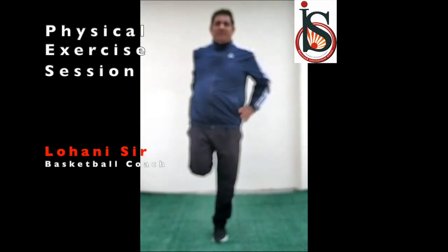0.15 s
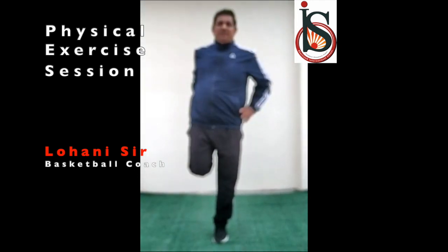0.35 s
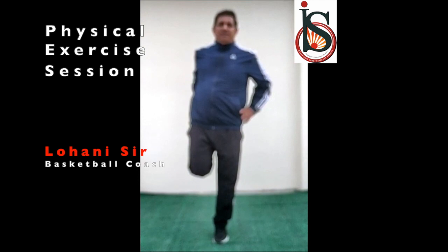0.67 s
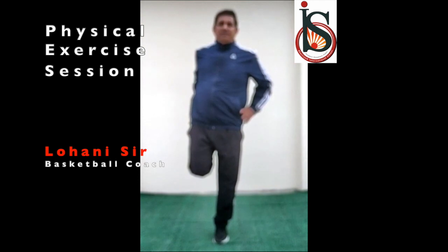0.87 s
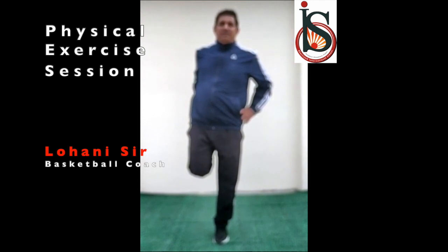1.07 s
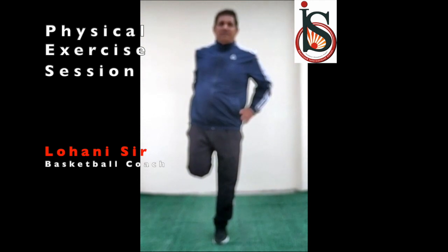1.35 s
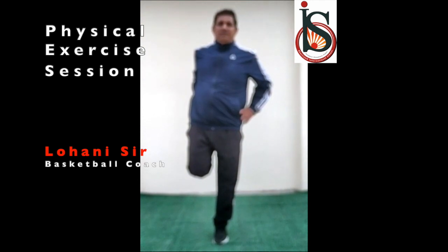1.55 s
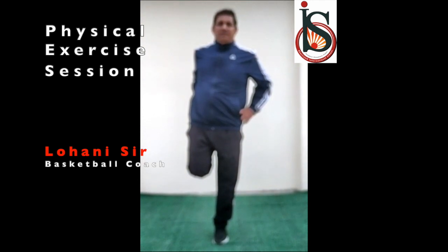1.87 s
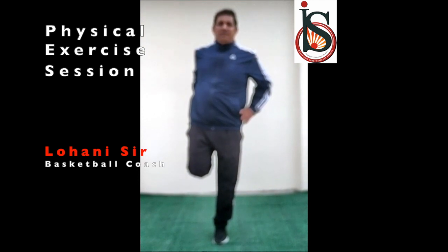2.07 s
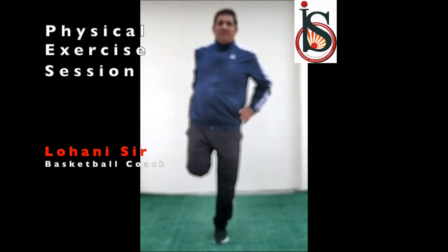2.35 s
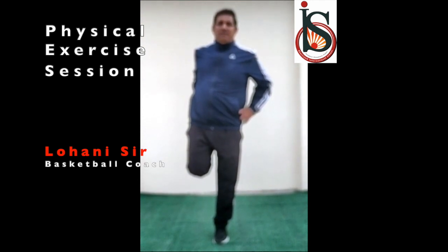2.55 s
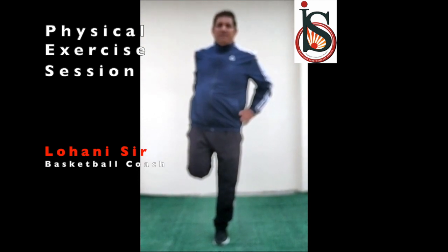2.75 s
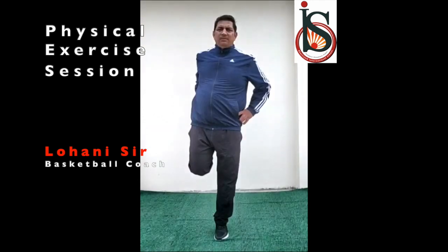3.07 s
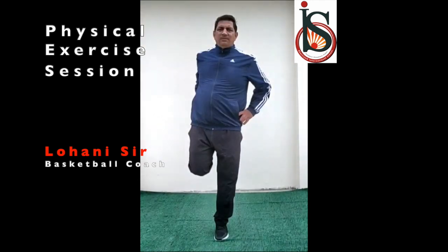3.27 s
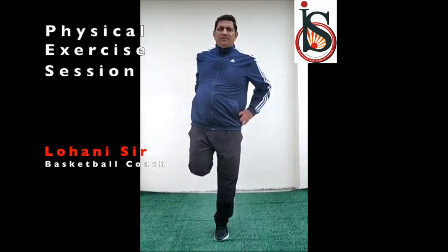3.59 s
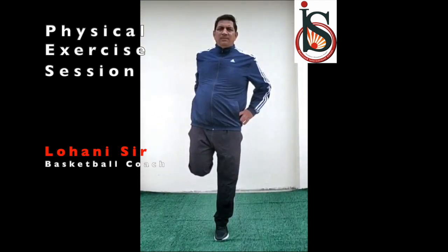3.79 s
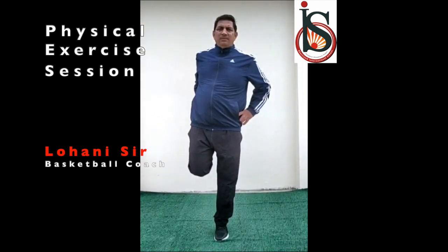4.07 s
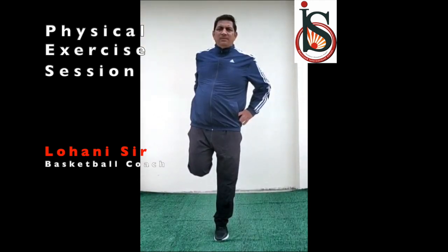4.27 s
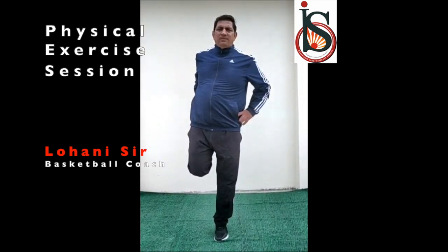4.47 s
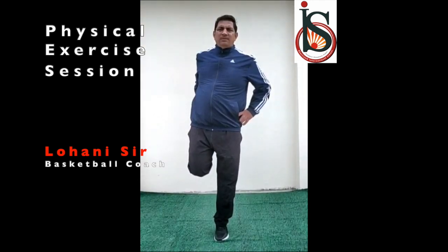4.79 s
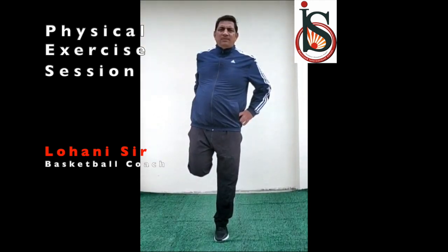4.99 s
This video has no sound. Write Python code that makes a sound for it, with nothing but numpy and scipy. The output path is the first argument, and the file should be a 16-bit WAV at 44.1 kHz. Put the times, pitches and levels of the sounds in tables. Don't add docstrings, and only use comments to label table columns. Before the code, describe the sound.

A bird rolls out low throbbing notes with far echoes while a nearer one throws sharp falling chirps; soft wind thumps outdoors.

```python
import sys
import numpy as np
from scipy import signal
from scipy.fft import rfft, irfft, next_fast_len
from scipy.io import wavfile
from scipy.ndimage import uniform_filter1d, map_coordinates

SR = 44100
rng = np.random.default_rng(int(sys.argv[2]) if len(sys.argv) > 2 else 0)


def materialize(psi):
    bounded = np.clip(np.atleast_2d(psi).T, -1, 1)
    quanta = np.round(bounded * 32767).astype(np.int16)
    wavfile.write(sys.argv[1], SR, quanta)


def boost_factor(decibels):
    exponent = np.asarray(decibels, float) / 20
    return 10 ** exponent


N = 226385


def along(points, hz):
    f, v = np.transpose(points)
    return np.interp(np.log(hz + 1), np.log(f + 1), v)


def unit(x):
    return x / np.sqrt(np.mean(x ** 2) + 1e-20)


def filtered(x, response):
    m = next_fast_len(N + SR // 2)
    hz = np.fft.rfftfreq(m, 1 / SR)
    return irfft(rfft(x, m) * response(hz), m)[..., :N]


def add(track, s, piece):
    start = max(round(s * SR), 0)
    room = track[..., start:start + piece.shape[-1]]
    room += piece[..., :room.shape[-1]]


def wobble(size, rate):
    knots = rng.standard_normal(int(size * rate / SR) + 4)
    return map_coordinates(knots, [np.arange(size) * rate / SR])


# hz, likeness (0-1)
PORT_LIKENESS = [(100, 1), (640, 0.83), (1400, 0.3), (3000, 0.05), (15000, 0)]


def rush(spectrum, patchy_db):
    z = signal.stft(rng.standard_normal((2, N)), nperseg=512)[2]
    patches = uniform_filter1d(uniform_filter1d(rng.standard_normal(z.shape[1:]), 5, 0), 10, 1)
    pair = signal.istft(z * boost_factor(patchy_db * unit(patches)), nperseg=512)[1][:, :N]

    def color(hz):
        turn = np.arccos(np.clip(along(PORT_LIKENESS, hz), -1, 1)) / 2
        return boost_factor(along(spectrum, hz)) * np.array([np.cos(turn), np.sin(turn)])

    mid, side = filtered(pair, color)
    return unit(np.array([mid + side, mid - side]))


# hz, t60_s
YARD_DECAY = [(500, 0.14), (2500, 0.41), (5000, 0.67), (10000, 0.28)]


def yard(x, haste):
    hz, t, z = signal.stft(rng.standard_normal((2, SR // 2)), SR, nperseg=256)
    decay = boost_factor(-60 * haste * t / along(YARD_DECAY, hz)[:, None])
    tail = signal.istft(z * decay, SR, nperseg=256)[1]
    return signal.fftconvolve(x[None], tail / np.linalg.norm(tail[0]), axes=1)[:, :N]


# start_s, flock_db, town_db
WASH_LEVELS = [(0.0, -69.5, -60), (0.26, -71, -55.5), (1.109, -72.5, -65), (1.428, -69.5, -55.5),
               (1.998, -75, -64.5), (2.16, -81, -62.5), (3.34, -60.5, -59), (3.761, -68.5, -57),
               (4.26, -83, -67), (4.429, -62, -48), (4.718, -62.5, -62), (5.13, -48, -47)]
# hz, level_db (per Hz)
AIR_COLOR = [(260, -57), (450, 6.5), (623, -2.5), (1230, -16.5), (1760, -15.5), (2010, -15), (2470, -19.5),
             (3180, -22), (11700, -22.5), (15500, -16)]
FLOCK_COLOR = [(1200, -52), (1600, -3.5), (2000, 2), (2600, -10.5), (3600, -3), (4300, -8), (5200, -19),
               (6200, -60.5)]
TOWN_COLOR = [(15, -53.5), (40, -11), (85, -10), (103, 3), (125, -16.5), (200, -8), (250, -2), (340, 1.5),
              (430, -8), (560, -40)]


def background():
    hum_top_hz = 182
    s, *levels = np.transpose(WASH_LEVELS)
    flock_db, town_db = [np.interp(np.arange(N) / SR, s, db) for db in levels]
    flock = boost_factor(flock_db - 1.0) * rush(FLOCK_COLOR, patchy_db=5.5)
    town = filtered(boost_factor(town_db + 1.0) * rush(TOWN_COLOR, patchy_db=3.5), lambda hz: hz > hum_top_hz)
    hum = filtered(boost_factor(-61) * rush(TOWN_COLOR, patchy_db=2.9), lambda hz: hz <= hum_top_hz)
    air = boost_factor(-60.5) * boost_factor([[-2.5], [-.6]]) * rush(AIR_COLOR, patchy_db=4.5)
    return air + town + hum + flock


# start_s (first eddy), length_s, level_db, fade_db_per_s
GUSTS = [
    (0.862, .045, -45, -30),
    (1.292, 0.076, -47.5, -57),
    (1.453, .13, -22.5, -40.5),
    (1.821, .02, -31, 8),
    (1.891, 0.14, -18.5, -47),
    (2.056, .1, -45, 9),
    (2.325, 0.0604, -40.5, 149),
    (2.469, 0.0306, -33.5, -3),
    (4.588, 0.076, -35, -19),
    (4.898, .02, -41, 5),
]


def eddies():
    shed_s, tone_hz, width_ms = .037, 110.7, 12
    rows, step = [], np.arange(6) * shed_s
    for (s, span, db, fade), luck in zip(GUSTS, rng.standard_normal((len(GUSTS), 2, 4, 6))):
        for (late, size, tone, width), lag, loss in zip(luck, (0, .017), (0, -9)):
            spent = 3000 * np.clip(step - span, 0, 1)
            level = db + loss + fade * step + 2 * size - spent
            times = s + step + lag + .003 * late
            rows += zip(times, level, tone_hz * np.exp(.17 * tone), width_ms * np.exp(.3 * width))
    return rows


def bursts(rows, stretch):
    track, t = np.zeros(N), np.arange(-SR // 20, SR // 20) / SR
    for (s, db, hz, ms), turn in zip(rows, rng.random((len(rows), 1))):
        bell = np.exp(-(t / (stretch * ms / 1000)) ** 2)
        burst = boost_factor(db) * bell * np.cos(2 * np.pi * (hz * t + turn))
        skip = max(0, len(t) // 2 - round(s * SR))
        add(track, s - 1 / 20, burst[skip:])
    return track


# hz, level_db (per Hz)
TURBULENCE_COLOR = [(15, -35), (60, -4.5), (120, -11.5), (250, -12), (450, -24.5), (900, -69)]


def wind():
    puffs = bursts(eddies(), stretch=0.5)
    sharpened = puffs + 0.41 * puffs * np.abs(puffs)
    gust = uniform_filter1d(uniform_filter1d(np.abs(puffs), 900), 900)
    turbulence = boost_factor(-3.5) * gust * rush(TURBULENCE_COLOR, patchy_db=-0.5)[0]
    return (sharpened + turbulence) * boost_factor([[-30], [0.3]])


# start_s, length_s, level_db
CAWS = [
    (0.154, 0.31, -59.5),
    (0.66, 0.29, -65.5),
    (0.886, 0.19, -67),
    (4.784, 0.37, -62.5),
]
# hz, level_db (per Hz)
CROW_THROAT = [(1050, -54), (1250, -6), (1450, 2.5), (1600, -4.5), (1800, 5.5), (2100, -12.5), (2400, -49)]


def crow():
    swell = np.zeros(N)
    for s, span, db in CAWS:
        add(swell, s, boost_factor(db) * signal.windows.tukey(round(span * SR), .6))
    return swell * rush(CROW_THROAT, patchy_db=2.5) * boost_factor([[-4], [1.5]])


# start_s, length_s, start_hz, end_hz, peak_db
WHISTLES = [(0.0, 0.042, 5306, 5020, -55.5), (0.286, 0.38, 3368, 2887, -72.5),
            (0.645, 0.02, 4570, 4750, -69), (0.765, 0.087, 3064, 2340, -56),
            (0.83, 0.0314, 2553, 2365, -54), (0.914, 0.0242, 1730, 2184, -66),
            (0.931, 0.0487, 2205, 1866, -42), (1.522, 0.023, 5160, 5600, -52.5),
            (2.088, 0.052, 3004, 2770, -67), (2.137, 0.015, 3620, 4160, -60.5),
            (2.294, 0.043, 5000, 4955, -58.5), (2.561, 0.059, 4110, 5585, -68.5),
            (3.377, 0.041, 4140, 3870, -53), (3.617, 0.1, 2796, 2424, -56.5),
            (3.699, 0.031, 3620, 3390, -67),
            (4.235, 0.053, 1824, 2396, -54.5), (4.273, 0.033, 4320, 4320, -57.5),
          (4.296, 0.06, 2860, 2298, -40), (4.313, 0.077, 4230, 3310, -49),
          (4.401, 0.077, 5380, 4840, -62.5), (4.456, 0.06, 2083, 1712, -46),
          (4.578, 0.056, 4090, 3190, -47), (4.615, 0.086, 2067, 1830, -41),
          (4.659, 0.041, 4660, 5050, -63.5), (4.756, 0.041, 2660, 2400, -53),
          (4.798, 0.048, 2214, 2346, -53.5), (4.837, 0.11, 3774, 3440, -41.5),
          (4.845, 0.073, 3167, 2286, -35.5), (5.023, 0.035, 2255, 2442, -36),
          (5.036, 0.051, 2410, 2238, -35.5), (5.089, 0.04, 3800, 3400, -45.5)]


def far_birds():
    out = np.zeros((2, N))
    songs = WHISTLES
    for (s, span, start_hz, end_hz, db), side in zip(songs, rng.standard_normal((len(songs), 1))):
        u = np.linspace(0, 1, round(span * SR))
        pitch = (start_hz + (end_hz - start_hz) * u) * (1 + 0.015 * wobble(len(u), 600))
        phase = 2 * np.pi * np.cumsum(pitch) / SR
        flutter_db = 3.5 * np.array([wobble(len(u), 110), wobble(len(u), 150)])
        shape = np.sin(np.pi * u ** .7) * boost_factor(flutter_db)
        add(out, s, boost_factor(db + 2 * side * np.array([[1], [-1]])) * shape * np.sin(phase))
    return out + boost_factor(-2.0) * yard(out.mean(axis=0), haste=2.3)


# share of its length, ratio to crest pitch, level_db
CALL = [
    (0, .79, -13),
    (.035, .855, -2),
    (.082, 1.1, -8.5),
    (.16, .975, -1.5),
    (0.309, 1.001, -1.5),
    (0.518, .915, -1),
    (.78, .8, 0),
    (.91, .72, -2.5),
    (1.001, .615, -16.5),
]


def call_rows(s, span, hz, db, push, push_db):
    u = np.linspace(0, 1, num=100)
    share, ratio, shape_db = np.transpose(CALL)
    near = (u - push) / 0.089
    bell = push_db * np.exp(-near ** 2)
    pitch = hz * np.interp(u, share, ratio) * (1 - 0.0024 * 2 * near * bell)
    return np.transpose([s + u * span, pitch, db + np.interp(u, share, shape_db) + bell])


# hz, gain_db
BEAK = [(1500, -55), (1930, -32), (2080, -10), (2350, -16), (4300, -14), (5000, -8), (5650, -8),
        (6050, -24), (6500, -40), (7300, -30), (8200, -21), (8800, -23), (9700, -25), (10300, -36),
        (11500, -36), (13000, -55)]
# hz, gain_db
LEAVES = [(1500, 12.5), (3300, -5.5), (4300, -2), (5200, -3.5), (8000, 3), (11000, -4)]


def chirp(rows, open_s, shut_s, flick_db, third_db, upper_db, slap_db):
    s, hz, db = np.transpose(rows)
    t = np.arange(s[0] - .003, s[-1] + 0.003, 1 / SR)
    size, since, left = len(t), t - t[0], t[-1] - t
    pitch = uniform_filter1d(np.interp(t, s, hz), 90)
    level = boost_factor(np.interp(t, s, db) + .9 * wobble(size, 200)) * signal.windows.tukey(size, .06)
    phase = 2 * np.pi * np.cumsum(pitch) / SR

    def partial(k, gain_db):
        rough = .02 * k * k * wobble(size, 700)
        return boost_factor(gain_db + along(BEAK, k * pitch)) * np.sin(k * phase + rough)

    upper = np.zeros(size)
    for k in range(4, 7):
        upper += partial(k, upper_db - 6 * (k - 4) + (2.5 * k - 8) * wobble(size, 40))
    upper *= np.clip((since - .012) / .03, .1, 1) * np.clip(left / .03, 0, 1)
    flick_loss = flick_db * np.clip((open_s - since) / 0.013, 0, 1)
    shut_loss = 12 * np.clip((since - shut_s) / .015, 0, 1)
    third = partial(2.983, third_db + 3.0 * wobble(size, 86) - flick_loss - shut_loss)

    voice, slap = np.zeros((2, N))
    add(voice, t[0], level * (partial(0.99, 3) + np.sin(2 * phase) + third + upper))
    slap_level = level * boost_factor(slap_db + 5 * wobble(size, 90)) * np.clip((pitch - 1600) / 250, 0, 1)
    add(slap, t[0] + .072, slap_level * np.sin(2 * phase + .7 * wobble(size, 500)))

    ports = filtered(voice[None], lambda f: np.exp(.6j * np.array([[1], [-1]]) * (f > 0)))
    late_s = .015
    answer = filtered(yard(voice, haste=1.8),
                      lambda f: boost_factor(along(LEAVES, f)) * np.exp(-2j * np.pi * f * late_s))
    return ports + slap + boost_factor(-13) * answer


# start_s, length_s, crest_hz, level_db, push (share of the length), push_db
CHIRPS = [
    (1.281, 0.15, 2192, -32, .52, 6.5),
    (2.806, 0.14, 2155, -26.5, .26, 7),
    (4.876, .139, 2043, -25.5, 0.47, 0),
]


def near_bird():
    first, second, third = [call_rows(*row) for row in CHIRPS]
    near = chirp(first, open_s=0.066, shut_s=0.21, flick_db=16.5, third_db=2.5, upper_db=-4, slap_db=-15)
    near += chirp(second, open_s=0.033, shut_s=0.18, flick_db=1, third_db=-1.0, upper_db=7, slap_db=-27.5)
    near += chirp(third, open_s=0.072, shut_s=0.097, flick_db=14, third_db=-4.5, upper_db=0, slap_db=-22)
    return near


# crest_s, level_db, crest_hz, rise_s, fall_s
NOTES = [
    (0.02, -29.5, 691.3, 0.059, 0.03893),
    (0.337, -30, 693.2, .09, .09),
    (1.243, -31, 682.3, 0.0523, .11),
    (1.575, -29, 681.5, 0.0816, 0.076),
    (2.107, -31.5, 696.4, 0.073, .09),
    (3.535, -26.5, 695.4, 0.056, 0.0795),
    (3.851, -31, 667, .08, .12),
    (4.524, -26, 696.2, 0.0803, 0.0658),
    (4.927, -28, 703, 0.0814, 0.08),
]
# center_s, level_db, width_ms, slip_hz
ACCENTS = [(.212, -39, 5.6, 3), (0.265, -37, 6.8, -27.5), (0.313, -22.5, 4.9, -21.5), (.337, -20, 14, -1.5),
           (0.366, -28.5, 6.16, -21), (0.401, -34.5, 13.2, -20.5), (1.209, -33.5, 3.5, -10),
           (1.224, -23.5, 5.5, -13.5), (1.248, -25.5, 12, -13.5), (1.499, -33.5, 4, -16),
           (1.537, -22.5, 4.9, -14.5), (1.585, -33, 7.3, -8.5), (2.026, -32.5, 4.9, -20),
           (2.058, -32.5, 8, -46), (2.096, -21, 11, 4), (3.49, -26, 9.4, -32), (3.529, -21, 6, 8),
           (3.552, -23, 8, 0), (3.782, -30.5, 3.6, 27), (3.81, -29, 4.6, -25), (3.826, -28.5, 2.5, 0.5),
           (3.864, -30, 21.7, 8.5), (4.204, -35, 6.6, -1.5), (4.506, -29, 4.3, -48.5),
           (4.538, -27, 7.3, -5), (4.807, -31, 2.5, 16), (4.856, -28, 4.6, -11), (4.877, -20, 3.4, -30),
           (4.935, -24, 8, -5), (4.973, -28, 2.3, -2)]


def low_voice():
    throb_hz, throb_depth, crest_throb = 66, .62, 0.47
    edge_db, sag_hz = -12, 45.11
    waver_hz, slip_per_throb_hz = 13, 9
    t = np.arange(N) / SR
    crest, db, hz, rise, fall = np.transpose(NOTES)
    k = np.searchsorted((crest[1:] - rise[1:] + crest[:-1] + fall[:-1]) / 2, t)
    u = (t - crest[k]) / np.where(t < crest[k], rise[k], fall[k])
    swell = boost_factor(db[k] + edge_db * np.minimum(u ** 2 + 0.13 * u ** 4, 9))
    beat = np.cos(2 * np.pi * np.cumsum(throb_hz * (1 + .25 * wobble(N, 40))) / SR)
    throb = 1 + throb_depth * np.clip(crest_throb + np.abs(u), 0, 1) * beat
    level = swell * throb * boost_factor(2 * wobble(N, 50))
    sag = sag_hz * u ** 2 * np.exp(-(u / 1.25) ** 8)
    pitch = hz[k] - sag + waver_hz * wobble(N, 70) + slip_per_throb_hz * beat
    for s, accent_db, ms, slip_hz in ACCENTS:
        near = slice(round((s - .05) * SR), round((s + .05) * SR))
        bell = np.exp(-np.abs((t[near] - s) * 1000 / ms) ** 2.5)
        level[near] += boost_factor(accent_db) * bell
        pitch[near] += slip_hz * bell
    return level * np.sin(2 * np.pi * np.cumsum(pitch) / SR)


# delay_s, level_db
FAR_WALLS = [
    (.297, -14),
    (.44, -25.5),
]
# hz, level_db (per Hz)
RASP_COLOR = [(350, -50), (480, -12), (800, 0), (1000, -6), (1150, -30), (1400, -60)]
# hz, level_db (per Hz)
VALLEY_COLOR = [(480, -44), (580, -13), (630, -9), (690, -2.5), (730, -22), (850, -21), (1000, -56.5)]


def low_bird():
    voice = low_voice()
    walls = np.zeros(N)
    for s, db in FAR_WALLS:
        add(walls, s, boost_factor(db) * voice)
    effort = uniform_filter1d(np.abs(voice), 500)
    rasp = boost_factor(-26) * effort * rush(RASP_COLOR, patchy_db=2)
    valley_t60_s = 1.79
    decay = boost_factor(-120 * np.arange(2 * SR) / SR / valley_t60_s)
    fading = signal.fftconvolve(voice ** 2, decay)[:N] * 10 / SR
    echo = (boost_factor(-20) * np.sqrt(np.abs(fading)) + boost_factor(-69)) * rush(VALLEY_COLOR, patchy_db=3.0)
    blurred = boost_factor(-7.5) * yard(walls, haste=1.2)
    direct = (voice + 0.63 * walls + rasp) * boost_factor([[-2.5], [1.8]])
    return direct + boost_factor(-9) * yard(voice, haste=1.0) + blurred + echo


def scene():
    return background() + wind() + crow() + far_birds() + near_bird() + low_bird()


def thinned(x, keep_db, mask_db):
    treble_hz = 2600
    hz, t, z = signal.stft(x, SR, nperseg=2048)
    size = np.abs(z) * (hz[:, None] > treble_hz)
    bands = np.repeat(rng.standard_normal((len(hz) // 16 + 1, len(t))), 16, axis=0)[:len(hz)]
    drift_db = 2.8 * uniform_filter1d(bands, size=2, axis=1)
    thrift_db = along([(3000, -16.5), (5500, -4.0), (15000, 5)], hz)[:, None]
    usual = np.median(size, axis=2)[..., None] * boost_factor(keep_db + thrift_db + drift_db)
    masked = boost_factor(mask_db) * uniform_filter1d(size, size=240, axis=1)
    kept = (size > usual + masked) | (hz[:, None] <= treble_hz)
    return signal.istft(z * kept, SR, nperseg=2048)[1][:, :N]


def low_pass(x):
    return signal.sosfilt(signal.butter(12, 16750, fs=SR, output="sos"), x)


def record(dry):
    thin = thinned(dry, keep_db=0.0, mask_db=-24.5)
    mix = filtered(thin, lambda hz: hz < 15560)
    return low_pass(mix)


dry = scene()
out = record(dry)
materialize(out)
```